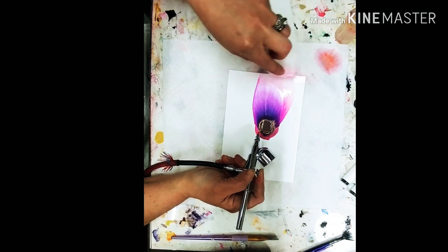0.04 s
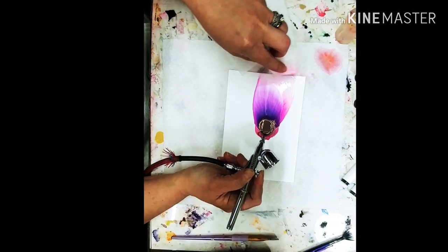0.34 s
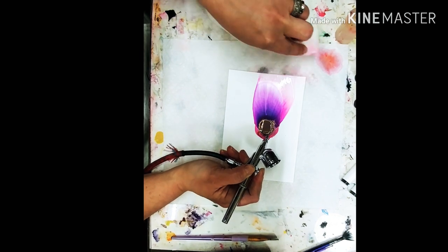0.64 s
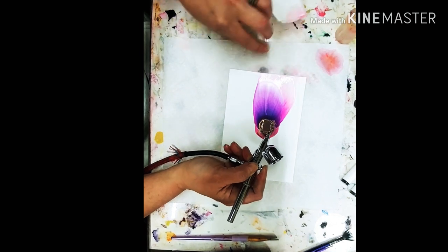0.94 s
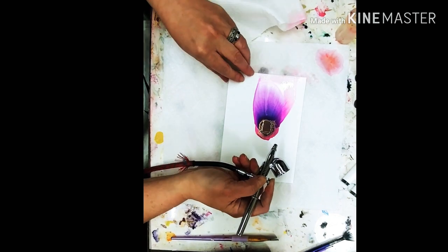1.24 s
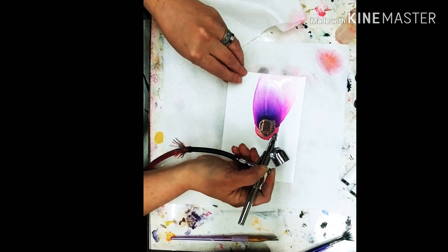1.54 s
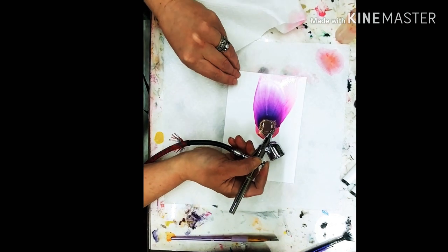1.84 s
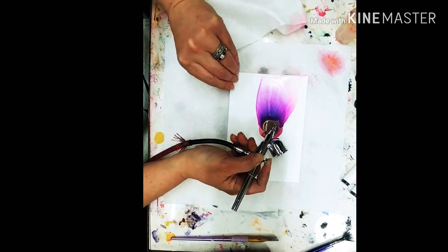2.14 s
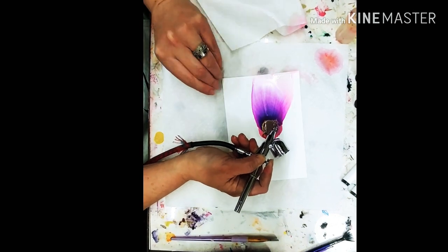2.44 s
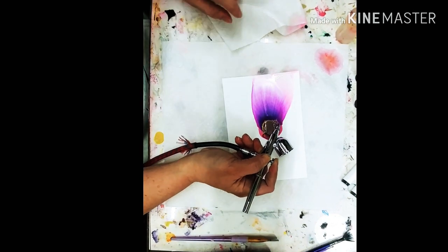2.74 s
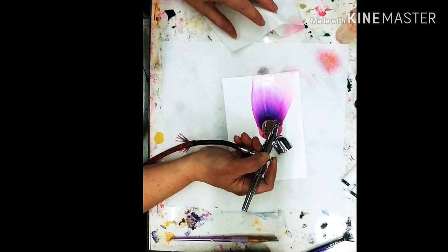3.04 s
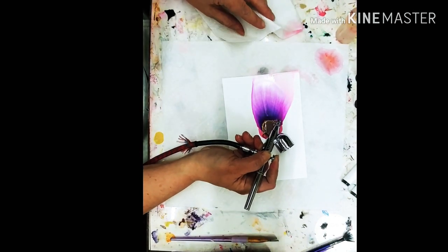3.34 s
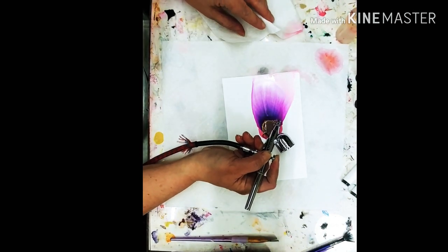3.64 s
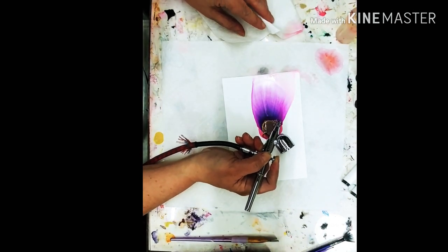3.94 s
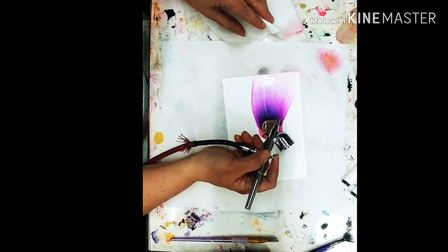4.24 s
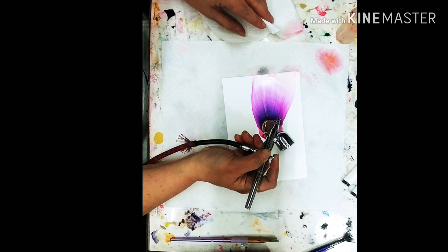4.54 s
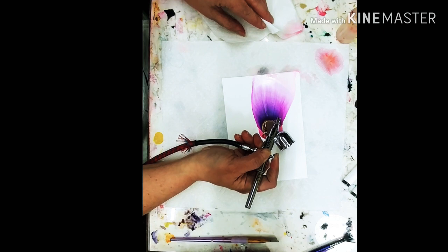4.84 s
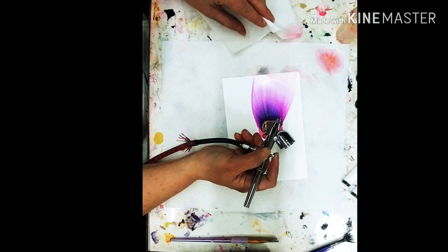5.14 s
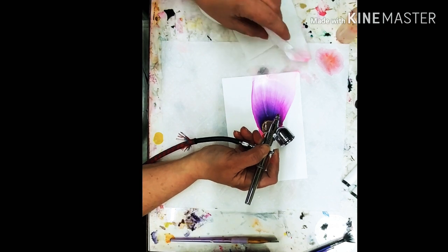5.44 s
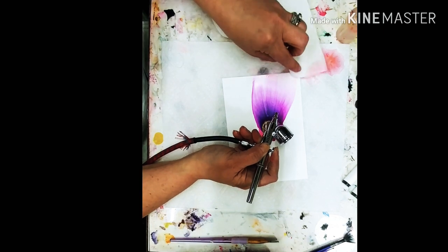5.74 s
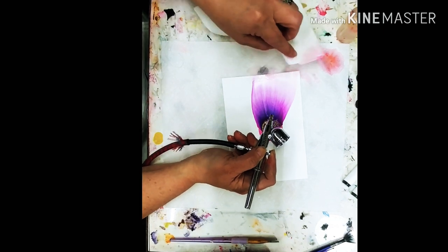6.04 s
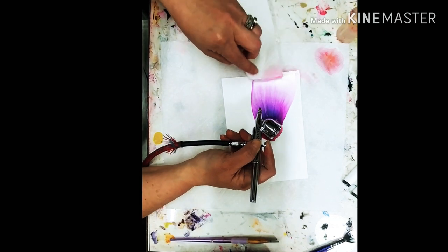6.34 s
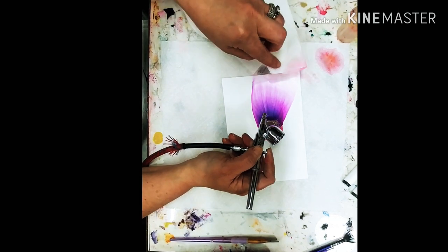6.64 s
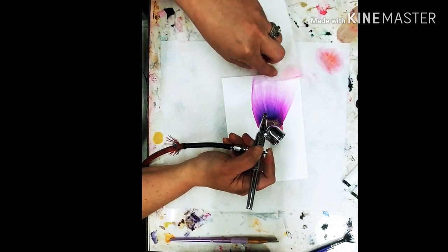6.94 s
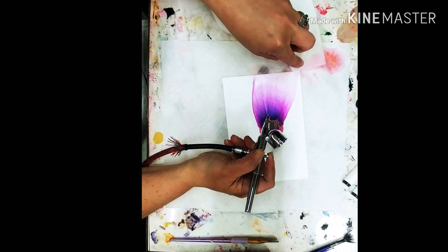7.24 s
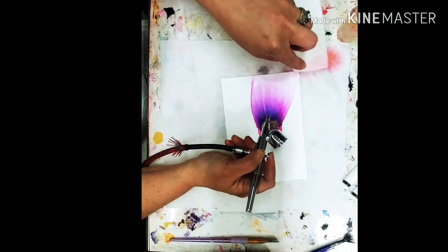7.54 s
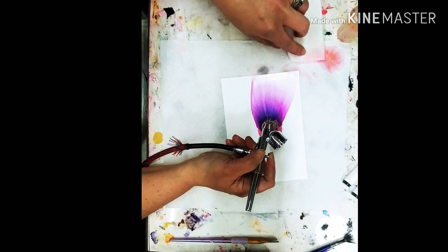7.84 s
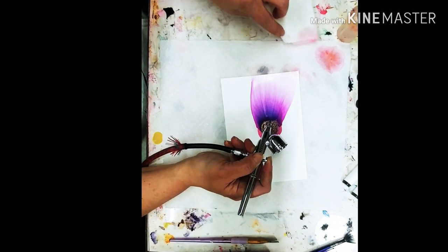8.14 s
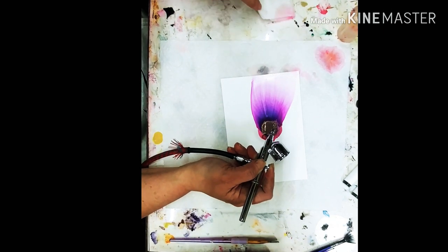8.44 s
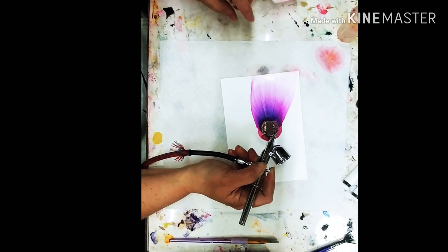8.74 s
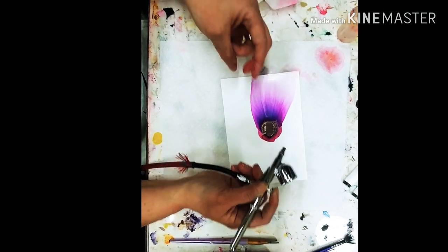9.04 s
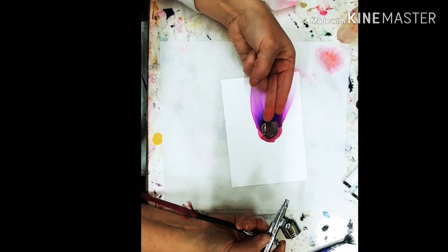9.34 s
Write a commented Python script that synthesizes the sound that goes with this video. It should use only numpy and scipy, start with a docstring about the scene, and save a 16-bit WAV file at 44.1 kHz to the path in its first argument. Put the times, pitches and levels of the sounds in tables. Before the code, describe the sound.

Close, continuous hiss of an airbrush, shifting slightly in tone before stopping abruptly, while a small compressor hums quietly behind it.

```python
"""Airbrush on paper

An airbrush sprays close under a phone in a small studio, until the trigger is let go and the valve
clicks shut. Its turbulent jet hisses, changing colour and place as the nozzle moves over the sheet;
the table and the walls answer. Behind it are steady background noise and the hum and throb of a small
compressor's motor and piston. A faint hollow drone swells once."""
import sys
import numpy as np
from scipy import signal
from scipy.fft import rfft, irfft, next_fast_len
from scipy.io import wavfile
from scipy.ndimage import uniform_filter1d, map_coordinates

SR = 44100
rng = np.random.default_rng(int(sys.argv[2]) if len(sys.argv) > 2 else 0)


def master_out(mix):
    """Clip the mix to full scale and print it as 16-bit PCM to the path in sys.argv[1]."""
    frames = np.transpose(np.atleast_2d(mix))
    ceiling = np.clip(frames, -1, 1)
    pcm = np.round(ceiling * 32767).astype(np.int16)
    wavfile.write(sys.argv[1], SR, pcm)


N = 422209
TIME_S = np.arange(N) / SR


def amp(db):
    """dB to gain."""
    return 10 ** (np.asarray(db) / 20)


def unit(x):
    """Scale to rms 1."""
    return x / np.sqrt(np.mean(x ** 2) + 1e-20)


def at_hz(table, hz):
    """Interpolate (f, value) rows on a log axis."""
    f, values = np.transpose(table)
    return np.interp(np.log(hz + 1), np.log(f), values)


def at_time(table, t=TIME_S):
    """Interpolate (t, value) rows."""
    return np.interp(t, *np.transpose(table))


def gate(t, start, end, ramp_s):
    """Trapezoid, half height at start and end."""
    return np.clip(np.minimum(t - start, end - t) / ramp_s + .5, 0, 1)


def wobble(rate_hz):
    """Smooth random curve, rate_hz knots a second."""
    knots = rng.standard_normal(int(N * rate_hz / SR) + 4)
    return map_coordinates(knots, [TIME_S * rate_hz], mode="nearest")


def bell(hz, centre, width):
    """Resonance curve, 1 at its centre."""
    return 1 / (1 + (2 * (hz - centre) / width) ** 2)


def filtered(x, response):
    """Apply a frequency response."""
    size = next_fast_len(N + 8192)
    return irfft(rfft(x, size) * response(np.fft.rfftfreq(size, 1 / SR)), size)[..., :N]


# Room field at the two microphones: f/Hz, left-right correlation
COHERENCE = [(50, .995), (85, .985), (180, .89), (350, .68), (650, .35), (900, -.2), (1200, -.6),
             (1800, -.3), (3000, 0)]
def half_angle(hz):
    """Half the left-right angle, in rad, that gives the room's correlation."""
    return np.arccos(np.clip(at_hz(COHERENCE, hz), -1, 1)) / 2


def diffuse(response):
    """Stereo noise from all over the room, rms 1."""
    shares = lambda hz: response(hz) * [np.cos(half_angle(hz)), np.sin(half_angle(hz))]
    mid, side = filtered(rng.standard_normal((2, N)), shares)
    return unit(np.array([mid + side, mid - side]))


def room_tone(cycles, hz):
    """Sine of rms 1; the room shifts its phase at each microphone."""
    shift = half_angle(hz)
    return np.sqrt(2) * np.sin(2 * np.pi * (cycles + rng.random()) + np.array([[shift], [-shift]]))


# Background noise spectrum: f/Hz, relative density/dB
BACKGROUND_SPECTRUM = [(20, -3.5), (60, 4.5), (140, -7.5), (350, -10), (750, -12), (1100, -11.5),
                       (1350, -21.5), (1650, -13.5), (2000, -25.5), (3000, -27), (8000, -34), (10500, -41),
                       (15000, -39)]
def background(rms_db=-63.5):
    """Steady diffuse noise."""
    return amp(rms_db) * diffuse(lambda hz: amp(at_hz(BACKGROUND_SPECTRUM, hz)))


def drone(start_s=6.53, end_s=7.33, rms_db=-70, centre_hz=299, width_hz=13):
    """A narrow, hollow noise band that swells once."""
    swell = amp(rms_db) * gate(TIME_S, start_s, end_s, ramp_s=0.097)
    return swell * diffuse(lambda hz: bell(hz, centre_hz, width_hz))


# Piston harmonics: multiple of the stroke rate, rms level/dB
PISTON_HARMONICS = [(2, -59), (3, -60), (5, -81), (6, -77), (7, -74), (8, -72), (11, -76), (12, -74.5),
                    (13, -79), (14, -81), (15, -81), (20, -79), (21, -76), (23, -76.5), (24, -77),
                    (25, -76), (26, -78), (28, -85)]
# Mains-driven motor hum: f/Hz, rms level/dB
MOTOR_HUM = [(48.9, -49.1), (97.8, -69), (120, -77), (240, -73)]
# Housing and table resonances: f/Hz, width/Hz, relative level/dB
HOUSING_MODES = [(87.6, 18.8, -0.5), (218.5, 44, -8), (242, 20, -13.5), (293, 8.6, -12.5),
                 (465.7, 30, -14.5), (658, 180, -18.5), (920, 145, -18), (1187, 40, -17.5)]
def compressor(stroke_hz=27.33, drift=0.00081, waver_db=1.74, rumble_db=-59.0):
    """Piston throb and motor hum over a rumble of housing and table."""
    strokes = stroke_hz * np.cumsum(1 + drift * wobble(2.004)) / SR
    piston = 0
    for order, db in PISTON_HARMONICS:
        depth_db = waver_db * min(order / 10, 1)  # stroke shape varies: high orders waver most
        piston += amp(db + depth_db * wobble(2.8)) * room_tone(order * strokes, order * stroke_hz)
    motor = sum(amp(db) * room_tone(hz * TIME_S, hz) for hz, db in MOTOR_HUM)
    rumble = diffuse(lambda hz: sum(amp(db) * bell(hz, f, width) for f, width, db in HOUSING_MODES))
    return piston + motor + amp(rumble_db + 1.3 * wobble(8.8)) * rumble


# Wall reverberation: f/Hz, T60/s
WALL_DECAY = [(1000, 0.086), (6000, 0.12), (14000, 0.029)]
def echoes(table_db=-10.5, walls_db=-6.5, table_t60_s=0.045, gap_s=.0012, even_hz=350):
    """Stereo impulse response: quick bounces off table and hands, then the walls."""
    hz, t, spectra = signal.stft(rng.standard_normal((2, SR // 4)), SR, nperseg=256)
    wall_decay = amp(-60 * t / at_hz(WALL_DECAY, hz)[:, None])
    walls = signal.istft(spectra * wall_decay, SR, nperseg=256)[1]
    length = walls.shape[1]
    table = rng.standard_normal(walls.shape) * amp(-60 * np.arange(length) / SR / table_t60_s)
    scaled = lambda x, db: amp(db) * x / np.linalg.norm(x, axis=1, keepdims=True)
    spectrum = rfft(scaled(table, table_db) + scaled(walls, walls_db))
    # Even out the broad colour, keep the fine ripple.
    power = np.abs(spectrum) ** 2
    smooth = lambda width_hz: np.abs(uniform_filter1d(power, int(width_hz * length / SR), axis=1))
    response = irfft(spectrum * np.sqrt(smooth(10 * even_hz) / smooth(even_hz)))
    return np.pad(response[:, :length // 2], ((0, 0), (int(gap_s * SR), 0)))


# Microphone balance, left duller: f/Hz, left minus right/dB
MIC_BALANCE = [(2000, 0), (2550, 3), (3300, -2.5), (4200, 1), (5500, 1.5), (6200, -0.5), (6950, 3),
               (7650, 0.5), (8000, -5), (8450, -4.5), (8900, -9), (11400, -4), (13000, -9.5), (14200, -3),
               (15400, -6)]
# Phase turn from the phone's body: f/Hz, left lead/rad
MIC_PHASE = [(2000, 0), (2800, -.5), (3400, .6), (4300, .6), (4700, -.4), (5400, .8), (6050, -.8),
             (6800, .4), (7800, -.8), (8300, -.1), (11000, 0), (12500, 1.5), (14000, 2), (14600, 3.4),
             (15200, 1.4)]
def microphones(hz):
    """Left and right frequency response, constant total power."""
    balance = np.array([amp(at_hz(MIC_BALANCE, hz)), np.ones_like(hz)])
    turn = np.exp(np.array([[.5j], [-.5j]]) * at_hz(MIC_PHASE, hz))
    return np.sqrt(2) * turn * balance / np.linalg.norm(balance, axis=0)


# Nozzle position: t/s, lead at the left microphone/ms
NOZZLE_LEAD = [(0, 0.017), (0.6, 0.018), (0.95, 0.031), (1.3, 0.006), (1.5, 0.019), (1.85, 0.049),
               (2.6, 0.045), (3.4, 0.047), (5.1, 0.066), (5.75, 0.074), (6.05, 0.074), (6.35, 0.096),
               (6.6, 0.075), (7.2, 0.055), (8.1, 0.053), (8.3, 0.035), (9, 0.038)]
def studio(source, direct_db=-2.0, patterns=12):
    """Direct path plus echoes, whose patterns crossfade as the hands move."""
    n = np.arange(N)
    half_lead = at_time(NOZZLE_LEAD) * SR / 2000  # samples
    direct = [map_coordinates(side, [n + sign * half_lead], order=5, mode="nearest")
              for side, sign in zip(source, (1, -1))]
    heard = amp(direct_db) * np.array(direct)
    for k in range(patterns):
        share = np.cos(np.pi / 2 * np.clip(n / N * (patterns - 1) - k, -1, 1))
        heard += signal.oaconvolve(share * source, echoes(), axes=1)[:, :N]
    return filtered(heard, microphones)


# Valve seating: t/s, level before trim/dB
VALVE_SEAT = [(9.097, -39.5)]
# Tick spectrum: f/Hz, relative density/dB
TICK_SPECTRUM = [(1500, -34), (3800, -5), (6500, 6), (8500, 4), (10300, -20), (12500, -1), (15500, -9)]
def valve(t60_s=0.013, trim_db=-2.0):
    """One small dry tick of metal on its seat."""
    envelope = sum((TIME_S >= seat_s) * amp(db + trim_db - 60 * np.abs(TIME_S - seat_s) / t60_s)
                   for seat_s, db in VALVE_SEAT)
    tick = filtered(rng.standard_normal(N), lambda hz: amp(at_hz(TICK_SPECTRUM, hz)))
    return envelope * unit(tick)


def hand_tremor(shape, depth_db=0.81):
    """The unsteady hand wavers the colour: random dB patches, about 500 Hz by 0.2 s."""
    patches = rng.standard_normal(shape)
    for _ in range(2):
        patches = uniform_filter1d(uniform_filter1d(patches, size=5, axis=0), size=32, axis=1)
    return depth_db * unit(patches)


# Hiss colour shifts: start t/s, end t/s, start f/Hz, end f/Hz, width/Hz, band lift/dB, fizz lift/dB
COLOUR_SHIFTS = [(-.1, 0.296, 6560, 6440, 850, 4.5, 3), (0.305, 1.364, 7700, 8240, 1000, 5.5, 1.5),
                 (0.325, 1.15, 2790, 2750, 360, 4.5, -0.5), (.5, 0.73, 8550, 8500, 700, 5, 3),
                 (.77, .95, 2830, 2760, 420, 1, 0), (.8, 1.49, 7650, 7720, 380, 3, 2),
                 (1.52, 2.05, 9500, 9650, 900, 12, -2), (1.534, 2.13, 6400, 6840, 900, 4.5, 2.5),
                 (1.94, 3.5, 5900, 6070, 250, 1.5, -1), (2.027, 5.15, 5170, 5500, 650, 4, -0.5),
                 (2.12, 5.16, 8400, 8380, 320, 5, 1), (2.2, 5.15, 6440, 6440, 240, -4, 0),
                 (2.2, 5.15, 6800, 6900, 400, 2, 0), (3.75, 5.2, 5900, 5900, 400, -2, 0),
                 (4.95, 6.103, 2950, 2860, 845, 2.5, 1), (5.13, 5.598, 7500, 7800, 1100, 1.5, -0.5),
                 (5.2, 7.89, 9100, 9200, 630, 2.5, 1), (5.963, 7.863, 7870, 7880, 650, 4, 0.4),
                 (6.52, 7.6, 7100, 7400, 380, 3, 0), (6.501, 9.1, 5770, 6100, 600, -2.5, 0.5),
                 (7.958, 9.118, 7930, 8180, 900, 7, 0), (8.1, 8.498, 6940, 7060, 600, 3.5, 1),
                 (8.16, 9.12, 2680, 2750, 700, 2.5, 1), (8.17, 8.37, 2280, 2280, 220, 10, 1.5),
                 (8.5, 8.74, 2270, 2270, 200, 6, 0), (8.968, 9.1, 7200, 5200, 1000, 6, 0),
                 (8.93, 9.011, 2380, 2250, 280, 14, 0.5)]
def shift_colour(air, ramp_s=0.13, fizz_edge_hz=8330):
    """Bands of the hiss swell, dip or glide for a while; the fizz rises or falls with them."""
    hz, t, spectra = signal.stft(air, SR, nperseg=512)
    hz = hz[:, None]
    lift_db = hand_tremor(spectra.shape)
    for start, end, from_hz, to_hz, width_hz, band_db, fizz_db in COLOUR_SHIFTS:
        centre_hz = np.interp(t, (start, end), (from_hz, to_hz))
        colour_db = band_db * bell(hz, centre_hz, width_hz) + fizz_db * (hz > fizz_edge_hz)
        lift_db += gate(t, start, end, ramp_s) * colour_db
    return signal.istft(spectra * amp(lift_db), SR, nperseg=512)[1][:, :N]


# Hand position: t/s, reach (0 held back, 1 over the drawing)
HAND_REACH = [(0, 0.42), (0.34, 0.08), (1.24, 0.31), (1.7, 0.55), (2.17, 0.74), (3.45, 0.84), (4.7, 0.83),
              (5.4, 0.73), (6.36, 0.61), (7.3, 0.62), (7.94, 0.74), (8.5, 0.8), (9, 0.8)]
def plume(band, spread):
    """Noise of rms 1, coloured by reach. The plume is long: each microphone has its own share, spread."""
    noise = np.sqrt(1 - spread) * rng.standard_normal(N) + np.sqrt(spread) * rng.standard_normal((2, N))
    hz, t, spectra = signal.stft(noise, SR, nperseg=512)
    back_db, over_db = (at_hz(np.array(band)[:, [0, k]], hz)[:, None] for k in (1, 2))
    gain = amp(back_db + at_time(HAND_REACH, t) * (over_db - back_db))
    gain /= np.linalg.norm(gain, axis=0)
    return unit(signal.istft(spectra * gain, SR, nperseg=512)[1][:, :N])


# Low, middle and high jet bands: f/Hz, relative density held back/dB, same over the drawing/dB
RUSH_BAND = [(1290, -51, -49), (1550, -24, -35.5), (2035, -23.5, -30.5), (2493, -2, -22.5),
             (2520, -7, -0.5), (2890, 2, -4), (3040, -3.5, 1.5), (3430, -7.5, -1), (3950, -8.5, -4),
             (4620, -6, -2.5), (5230, -2.5, 0.3), (6230, -9, 2.5), (6680, -10.5, -12.5), (8000, -59.5, -44)]
HISS_BAND = [(4500, -44, -48.5), (5610, -19, -11), (5960, -7, 0), (6600, 0, -1.5), (7000, 1, -1.9),
             (7460, -0.5, 0), (8080, 1.5, -1), (8200, 3, -8.5), (8380, 2, -12), (9010, -2.5, -11),
             (9210, -16, -13.5), (9770, -22.5, -18.5), (9770, -51, -18.5), (11600, -79, -58)]
FIZZ_BAND = [(9030, -39, -47), (10630, -40.5, -14), (11150, -33, -1), (11900, -14.5, -3.5),
             (12300, -1.5, -2), (13100, 3, 3), (13500, -6, -5.5), (14100, -1.5, -7), (14950, 0.5, -4.5),
             (15400, 2.5, -2.5), (17100, -33, -30)]
# Air flow set by the trigger finger: t/s, relative level/dB
TRIGGER_FLOW = [(0, -1.5), (0.27, -0.8), (0.39, 1.5), (0.62, -2.1), (0.76, -0.6), (0.88, -0.5),
                (1.21, -1.5), (1.58, -2.6), (2.05, 0), (2.2, 0.9), (2.5, 0.2), (3.03, -0.45), (3.45, -2.2),
                (3.95, -1), (4.2, -1), (4.6, -0.5), (5.07, -0.5), (5.37, 1), (5.62, -0.7), (5.72, -0.2),
                (5.82, -0.5), (5.93, 0), (6.42, -1), (6.6, -0.4), (7.05, -0.5), (7.3, -0.9), (8.02, -1.1),
                (8.25, -2), (8.75, -2), (9.02, -1)]
# Narrow fixed peaks that ring in the hiss: f/Hz, width/Hz, lift/dB
HISS_PEAKS = [(2766, 80, 2), (4960, 60, 2.8), (5130, 70, 1.5), (5387, 59, 2.5), (5565, 36, 4.5),
              (5995, 48, 3.2), (6250, 156, 1.3), (6766, 90, 1.7), (7299, 70, 3.2), (7560, 70, 1),
              (7825, 56, 2.3), (8835, 90, 3.8)]
def jet(release_s=9.04, closing_db_per_s=950, bleed_db=-26):
    """Turbulent air. On release the pressure collapses; a little bleeds until the valve seats."""
    flow_db, reach, lead_ms = map(at_time, (TRIGGER_FLOW, HAND_REACH, NOZZLE_LEAD))
    rush = amp(-44.5 + 7.15 * reach - 32.5 * lead_ms + 0.41 * wobble(12)) * plume(RUSH_BAND, spread=0.24)
    hiss = amp(-33 + 0.3 * reach - 26 * lead_ms + 0.14 * wobble(15)) * plume(HISS_BAND, spread=0.34)
    fizz = amp(-53.5 + 9.8 * reach + 61 * lead_ms + 0.85 * wobble(18)) * plume(FIZZ_BAND, spread=0.62)
    flutter_db = 0.59 * wobble(45)  # paint leaves the needle unevenly
    air = shift_colour(amp(flow_db) * (rush + hiss + fizz)) * amp(flutter_db)
    air = filtered(air, lambda hz: amp(sum(db * bell(hz, f, width) for f, width, db in HISS_PEAKS)))
    pressure = amp(-closing_db_per_s * np.maximum(TIME_S - release_s, 0))
    bleed = amp(bleed_db) * (TIME_S < VALVE_SEAT[0][0])
    return air * np.maximum(pressure, bleed)


def scene():
    """Airbrush in the studio over compressor, drone and background noise."""
    return studio(jet() + valve()) + compressor() + drone() + background()


def record(dry, top_hz=15600):
    """The phone's steep band limit."""
    return filtered(dry, lambda hz: 1 / (1 + (hz / top_hz) ** 500))


dry = scene()
out = record(dry)
master_out(out)
```